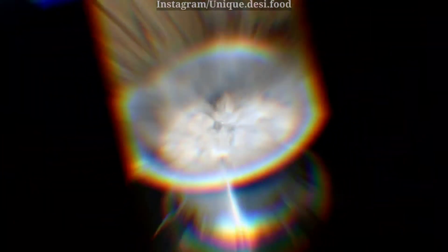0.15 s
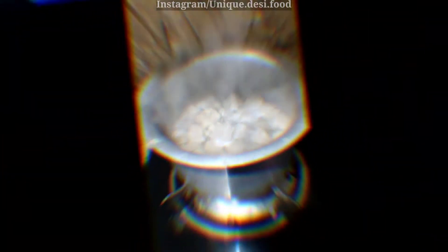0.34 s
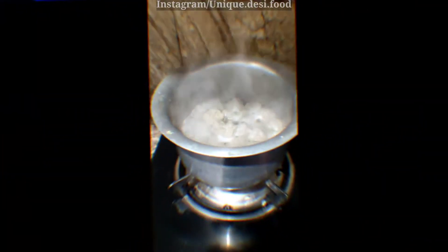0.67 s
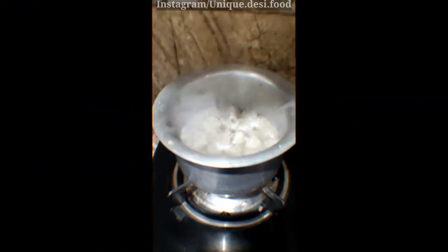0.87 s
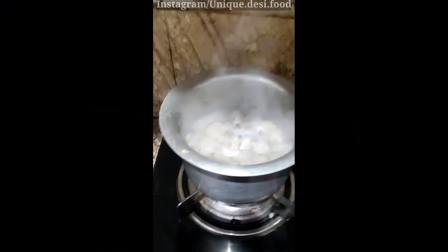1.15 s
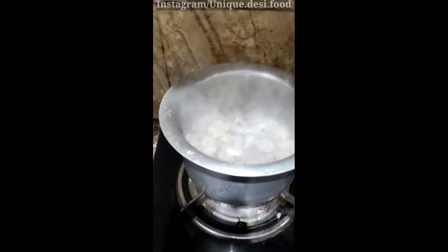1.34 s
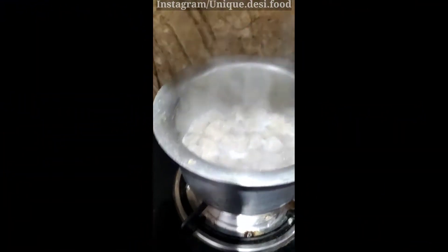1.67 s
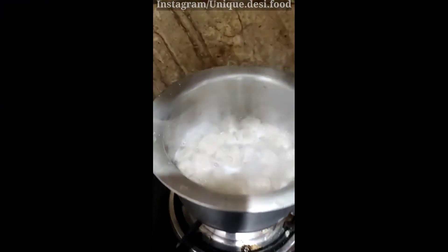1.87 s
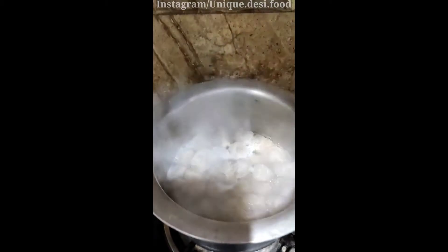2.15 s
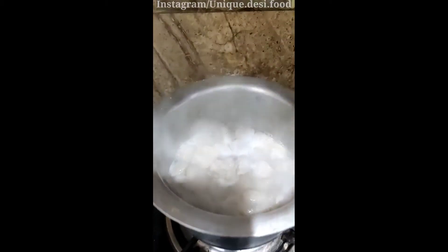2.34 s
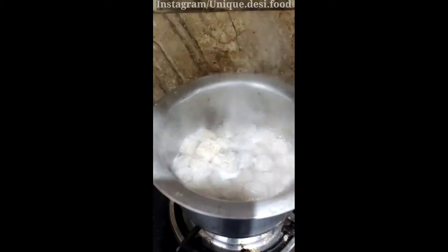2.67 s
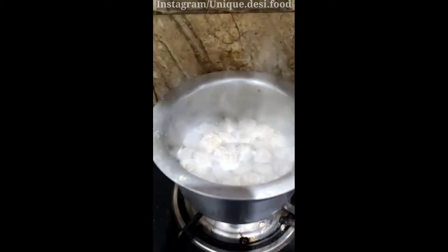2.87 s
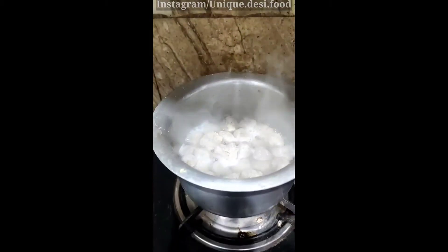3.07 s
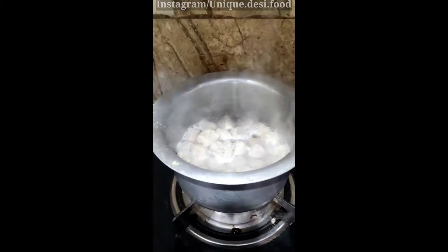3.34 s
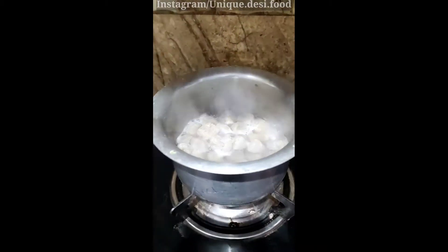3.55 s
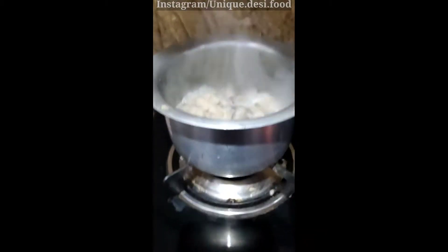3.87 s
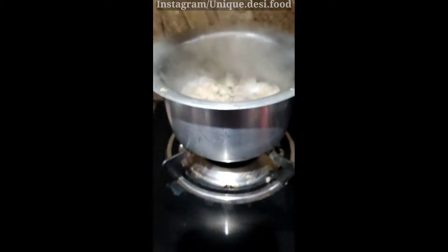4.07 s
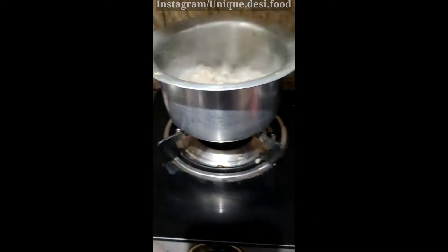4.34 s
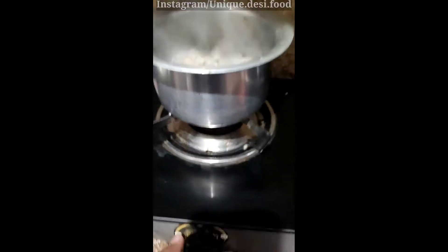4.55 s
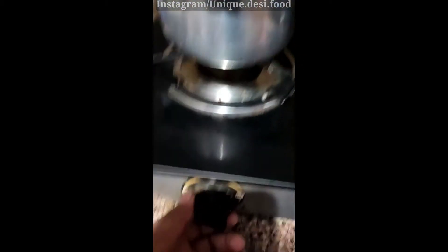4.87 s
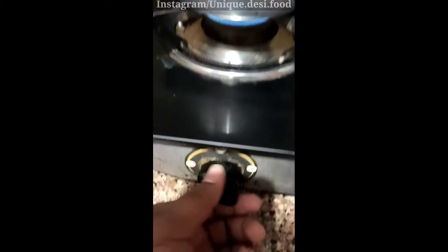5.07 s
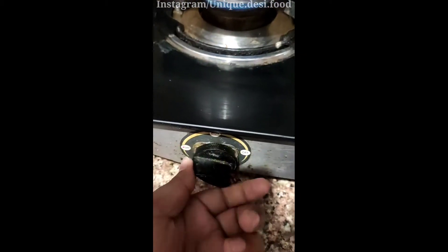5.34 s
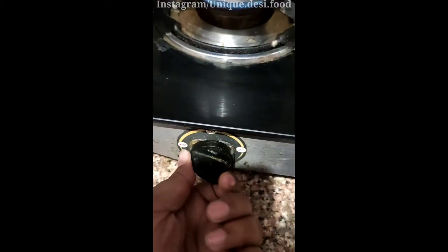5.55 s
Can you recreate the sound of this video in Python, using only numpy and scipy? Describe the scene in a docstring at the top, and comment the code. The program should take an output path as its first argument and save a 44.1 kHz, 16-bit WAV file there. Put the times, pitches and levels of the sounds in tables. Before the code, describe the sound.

In a hard-walled kitchen, water swishes and splashes over steel dishes. Thin metal jingles and dull knocks come between bursts, strongest around the middle. Then vessels clatter, one briefly sings as it is rubbed, and a pot lands hard at the very end. Low rumble wavers underneath; the stereo microphone is close, with a short room echo.

```python
"""Washing up in a hard-walled kitchen

Water swishes and splashes over steel dishes: bands of noise with ringing droplets, plus fading bursts.
A thin metal ring jingles, vessels are knocked and one is dropped hard at the end: volleys of clicks ring
their modes, and a rubbed vessel sings in rising sines. Low outdoor rumble, noise and a wavering tone,
swells in the room's standing waves; a finger taps once near the left microphone, a short filtered push."""
import sys
import numpy as np
from scipy import signal
from scipy.fft import rfft, irfft, next_fast_len
from scipy.io import wavfile
from scipy.ndimage import uniform_filter1d

SR = 44100
rng = np.random.default_rng(int(sys.argv[2]) if len(sys.argv) > 2 else 0)


def bounce(signal):
    """Save signal as a 16-bit WAV file at the path given by the first command-line argument."""
    frames = np.transpose(np.atleast_2d(signal))
    limited = np.clip(frames, -1, 1)
    pcm = np.round(limited * 32767).astype(np.int16)
    wavfile.write(sys.argv[1], SR, pcm)


def field_ratio(decibels):
    """Amplitude ratio for a level in dB (20 dB per decade); scalars and array-likes work."""
    return 10 ** (np.asarray(decibels, dtype=float) / 20)


N = 251807
HOP = 32   # samples between envelope values
LEFT_LAG = 12   # samples by which the left port hears later

# running swish before its trim: t/s, treble level/dB, middle level/dB, low middle level/dB
SWISH_CURVE = [(0.0, -46, -52.5, -56), (0.41, -44, -53.5, -52.5), (0.81, -43, -48, -52.5),
               (1.14, -39, -49, -48), (1.37, -60, -66, -53), (1.72, -49.5, -59.5, -59),
               (2.0, -45, -51.5, -52), (2.24, -41.5, -58.5, -55.5), (2.42, -66, -57.5, -57.5),
               (2.67, -49.5, -68, -54.5), (2.8, -48, -54, -54.5), (2.96, -44, -50, -57),
               (3.15, -49, -55, -55.5), (3.37, -50.5, -62, -57), (3.59, -53.5, -68, -53.5),
               (3.74, -49, -53.5, -50), (4.12, -48.5, -58.5, -54), (4.53, -44, -59, -56.5),
               (4.74, -62.5, -77, -55), (5.04, -42, -54, -56.5), (5.18, -48.5, -43.5, -46.5),
               (5.37, -45.5, -52, -52.5), (5.57, -40, -49, -55), (5.68, -38, -32.5, -37),
               (5.71, -40, -36, -52)]


def rms_one(x):
    """Scale to rms 1."""
    return x / np.sqrt(np.mean(x ** 2) + 1e-20)


def in_time(rows, hop=1):
    """Columns of a curve at every hop-th sample."""
    s, *columns = np.transpose(rows)
    t = np.arange(0, N, hop) / SR
    return [np.interp(t, s, column) for column in columns]


def at_hz(points, hz):
    """Value of a spectrum table at hz, interpolated over log frequency."""
    points = np.array(points, float)
    return np.interp(np.log(hz), np.log(np.maximum(points[:, 0], 1)), points[:, 1])


def drift(rate, count):
    """Slow chance of rms 1 at the envelope rate: noise through a low-pass with its corner near rate Hz."""
    r = np.exp(-2 * np.pi * HOP * rate / SR)
    settle = 2000
    noise = rng.standard_normal(count + settle)
    return rms_one(signal.lfilter([1], [1, -2 * r, r * r], noise)[settle:])


def above(x, hz):
    """Steep high-pass."""
    return signal.sosfilt(signal.butter(6, hz, "high", fs=SR, output="sos"), x)


def ring(clicks, hz, t60):
    """A resonator: a unit click sets a decaying sine of starting height 1 ringing."""
    r, w = field_ratio(-60 / (t60 * SR)), 2 * np.pi * hz / SR
    return signal.lfilter([0, np.sin(w)], [1, -2 * r * np.cos(w), r * r], clicks + 1e-18)


def rattle(s, decay_s):
    """A blow far off arrives as a short uneven volley of clicks, of energy 1."""
    out, at = np.zeros(N), round(s * SR)
    age = np.arange(SR // 2) / SR
    volley = rng.standard_normal(len(age)) * np.exp(-age / decay_s)
    out[at:at + len(age)] = (volley / np.sqrt(np.sum(volley ** 2)))[:N - at]
    return out


def struck_mode(s, decay_s, hz, t60):
    """One mode of a body rung by a blow, scaled to peak 1."""
    rung = ring(rattle(s, decay_s), hz, t60)
    return rung / np.abs(rung).max()


def struck_body(blow, modes):
    """One blow rings all the modes of a body."""
    s, blow_db, decay_s = blow
    return sum(field_ratio(blow_db + mode_db) * struck_mode(s, decay_s, hz, t60) for hz, mode_db, t60 in modes)


def two_ports(shared, own, hz):
    """The shared part reaches the left port later; the rest differs between the ports."""
    # how alike the ports sound: f/Hz, share of power in common [0..1]
    likeness = [(60, 0.65), (250, 1), (600, 0.78), (1500, 0.14), (5000, 0.13), (14000, 0.05)]
    # tilt of the stereo image: f/Hz, left minus right level/dB
    balance = [(60, 2.0), (150, 1), (380, 3.5), (950, 2.5), (2380, 0), (5980, 3), (15000, 2)]
    alike = np.clip(at_hz(likeness, hz), 0, 1)
    common = np.array([np.roll(shared, LEFT_LAG), shared])
    pair = np.sqrt(alike) * common + np.sqrt(1 - alike) * own
    return pair * field_ratio(at_hz(balance, hz) / 2 * np.array([[1], [-1]]))


def share(spectrum, edges):
    """Share of a spectrum's power that falls in each band."""
    power = field_ratio(2 * at_hz(spectrum, np.sqrt(edges[1:] * edges[:-1]))) * np.diff(edges)
    return power / power.sum()


def small_splashes():
    """Small splashes come by chance, louder where the swish is louder; rows as in splashes()."""
    count, over_swish_db, spread_db = 40, 5.5, 10
    treble_db = in_time(SWISH_CURVE)[0]
    rows = []
    for when, size, body, pitch in rng.random((count, 4)):
        level_db = treble_db[int(when * N)] + over_swish_db + spread_db * (2 * size - 1)
        middle_db = -21 + 20 * (body - 0.5)
        rows.append((when * N / SR, level_db, middle_db, -28, 3000 * 3 ** pitch, 0.22))
    return rows


def water_power(edges, swish_db, burst_db, colour_db, bump_db, rise_s):
    """Power per band: the running swish plus bursts that start sharply and die away."""
    # spectra of the three parts of the water: f/Hz, power density/dB per Hz
    treble = [(1470, -30), (2500, -6.5), (3660, -5), (6150, -5.5), (7510, -3.5), (8740, -10.5), (9370, -2),
              (10300, -10), (15500, -9.5)]
    middle = [(560, -63), (950, -18), (1100, 8.5), (1330, -14.5), (1620, 6.5), (2600, -2.5), (3380, -20),
              (5720, -120)]
    low_middle = [(120, -55), (200, -21), (264, 2.5), (350, -1.5), (403, -0.5), (510, -5), (620, 1),
                  (1000, -3.5), (1300, -7.5), (2200, -120)]
    centres = np.sqrt(edges[1:] * edges[:-1])
    shares = np.array([share(spectrum, edges) for spectrum in (treble, middle, low_middle)])
    power = shares.T @ field_ratio(2 * (swish_db + np.array(in_time(SWISH_CURVE, HOP))))
    t = np.arange(0, N, HOP) / SR
    for s, level_db, middle_db, low_db, bright_hz, t60 in splashes() + clatter() + small_splashes():
        age = np.maximum(t - s, 0)
        shape = (1 - np.exp(-age / rise_s)) * field_ratio(-120 * age / max(t60, 0.03))
        # each burst has a favourite pitch in its treble
        bump = field_ratio(2 * bump_db * np.exp(-np.log2(centres / bright_hz) ** 2 / 0.31))
        # noise carries its power well below its peaks
        trims_db = np.array([burst_db, middle_db + colour_db, low_db + colour_db])
        levels = field_ratio(2 * (level_db + trims_db))
        flat = np.ones_like(bump)
        power = power + np.outer(levels @ (shares * [bump, flat, flat]), shape)
    return power


def washing(flicker_db, together_db, drop_db, drops_per_s, cycles_at_1khz):
    """Third-octave bands of smooth spray, each with ringing droplets in it, shaped by the water's power."""
    # large droplets are fainter in the spray: f/Hz, level/dB
    low_drops = [(300, -3.5), (1200, 0)]
    edges = 170 * 2 ** np.arange(0, 6.7, 1 / 3)
    power = water_power(edges, swish_db=2.0, burst_db=-13, colour_db=-9.0, bump_db=6, rise_s=0.00046)
    white = rng.standard_normal((2, 3, N))   # neighbouring bands use different noise
    sizes = field_ratio(5.96 * np.minimum(rng.exponential(1, N), 4)) * (rng.random(N) < drops_per_s / SR)
    dealt = rng.integers(0, 2 * len(power), N)   # two droplet pitches a band
    out, together = 0, drift(11.8, count=power.shape[1])
    for k, (low, high) in enumerate(zip(edges, edges[1:])):
        hz = np.sqrt(low * high)
        band_pass = signal.butter(2, [low, high], "band", fs=SR, output="sos")
        band = signal.sosfilt(band_pass, white[k % 2]) * np.sqrt(SR / 2 / (high - low))
        drops = 0
        for j, pitch in enumerate(rng.uniform(low, high, size=2)):
            drops = drops + ring(sizes * (dealt == 2 * k + j), pitch, cycles_at_1khz / np.sqrt(pitch * 1000))
        spray = band[0] + field_ratio(drop_db + at_hz(low_drops, hz)) * rms_one(drops)
        flicker = field_ratio(together_db * together + flicker_db * drift(11.7, count=len(together)))
        gain = np.sqrt(power[k]) * flicker
        gain = np.interp(np.arange(N) / HOP, np.arange(len(gain)), gain)
        out = out + gain * two_ports(spray, band[1:], hz)
    return out


def basin(x, echo_db, t60):
    """Close reflections around the sink comb the spectrum finely and leave its broad shape alone."""
    size = next_fast_len(N + SR)
    age = np.arange(SR // 2) / SR
    echoes = rms_one(rng.standard_normal(len(age)) * field_ratio(-60 * age / t60))
    echoes *= field_ratio(echo_db) / np.sqrt(len(age))
    echoes[0] = 1   # the direct sound
    comb = rfft(echoes, size)
    comb /= np.sqrt(uniform_filter1d(np.abs(comb) ** 2, size=2000))
    return irfft(rfft(x, size) * comb, size)[:, :N]


def rumble():
    """Broad low noise, a wavering tone on the lowest standing wave, noise ringing in the upper ones."""
    # swells: t/s, broad noise level/dB, lowest standing wave level/dB, upper standing waves level/dB
    swells = [(0.0, -52.5, -59, -55.5), (0.71, -50, -50, -51), (0.92, -47.5, -53.5, -50.5),
              (1.0, -44.5, -43, -50.5), (1.64, -46, -34, -46.5), (1.76, -46, -44.5, -67),
              (1.89, -49, -43, -52.5), (2.04, -48.5, -57, -51.5), (2.3, -46.5, -46, -54.5),
              (2.5, -48, -53, -41), (2.62, -43.5, -45, -51), (2.99, -42.5, -53, -44),
              (3.12, -47.5, -49, -60), (3.26, -46, -46.5, -43.5), (3.54, -47.5, -53.5, -62),
              (3.75, -48.5, -47, -45.5), (4.15, -48.5, -56, -64.5), (4.5, -43.5, -50.5, -46),
              (4.71, -41, -49, -40), (4.82, -49, -42.5, -48), (5.33, -47, -34.5, -50.5),
              (5.45, -46, -44, -44.5), (5.71, -53, -50, -34.5)]
    # spectrum of the broad noise: f/Hz, power density/dB per Hz
    colour = [(12, -33), (20, 2.5), (43, 3), (97, -3), (131, -7.5), (210, -34.5), (270, -39), (460, -120)]
    # upper standing waves: f/Hz, nominal width/Hz, level/dB
    upper_waves = [(105.5, 1.93, -1), (123.8, 6.2, -7.5), (86.7, 6.1, -11)]
    # the low hum sits higher when strong: level/dB, f/Hz
    hum_pitch = [(-50, 55.5), (-43, 59.8)]
    broad_db, lowest_db, upper_db = in_time(swells)
    hz = np.maximum(np.arange(N // 2 + 1) * SR / N, 1)
    noise = irfft(rfft(rng.standard_normal((2, N))) * field_ratio(at_hz(colour, hz)), N)
    broad = field_ratio(broad_db) * rms_one(noise[0] + 0.21 * noise * [[1], [-1]])
    lowest_hz = np.interp(lowest_db, *np.transpose(hum_pitch))
    lowest = np.sqrt(2) * field_ratio(lowest_db) * np.sin(2 * np.pi * np.cumsum(lowest_hz) / SR)
    upper = sum(field_ratio(db) * rms_one(ring(rng.standard_normal(N), f, 2.54 / width))
                for f, width, db in upper_waves)
    return (broad + lowest + field_ratio(upper_db) * upper) * field_ratio([[0.8], [-0.8]])


def jingles():
    """Each touch rings the three high modes of a thin metal ring."""
    # touches: t/s, peak level of the first mode/dB, top mode re first/dB
    touches = [(0.0297, -34, -12), (0.4, -25, 2), (0.886, -23, -1), (0.98, -20.5, -19), (1.7904, -28, 8),
               (1.9346, -31, 14), (2.6335, -12, 3), (2.7417, -24, 9), (2.836, -32, -12), (3.4335, -31, -2),
               (4.726, -30, -15), (5.085, -29, -12)]
    # modes of the ring: f/Hz, t60/s
    ring_modes = [(9685, 0.07), (10810, 0.07), (15500, 0.1)]
    out = np.zeros(N)
    for s, peak_db, top_db in touches:
        for (hz, t60), mode_db in zip(ring_modes, (0, -16, top_db)):
            out += field_ratio(peak_db + mode_db) * struck_mode(s, 0.012, hz, t60)
    return out


def splashes():
    """Loud splashes of water: noisy bursts, each as bright as its favoured pitch and with its own decay."""
    # bursts before the trims of water_power: t/s, level/dB, middle re level/dB, favoured f/Hz, t60/s
    loud_splashes = [(0.262, -28.5, -28, 8590, 0.66), (0.5826, -31.5, -2, 3880, 0.36),
                     (0.6494, -35, 1, 8450, 0.51), (0.7506, -27.5, -8, 8330, 0.48),
                     (0.808, -23, -20, 4130, 0.22), (0.887, -27.5, -8.5, 5450, 0.95),
                     (0.941, -31.5, 2, 8110, 0.31), (1.0332, -21.5, -11.5, 3870, 0.22),
                     (1.148, -18.5, -21, 7300, 0.16), (1.207, -21, -10, 5040, 0.73),
                     (1.279, -17.5, -33, 6960, 0.15), (1.79, -28.5, -12, 8000, 0.32),
                     (2.0089, -32.5, -34, 8200, 0.35), (2.1594, -25.5, -9, 2800, 0.16),
                     (2.317, -29.5, -24, 9300, 0.66), (2.372, -28, -26, 8350, 0.21),
                     (2.62, -10.5, -16, 8060, 0.31), (2.71, -20.5, -6.5, 4080, 0.54),
                     (2.7494, -28, -2, 4030, 0.15), (2.8663, -24, -27, 9070, 0.16),
                     (2.8994, -30, -5, 7940, 0.54), (3.009, -12, -10, 7070, 0.2),
                     (3.0264, -10.5, -11, 4330, 0.17), (3.054, -15, -9, 3440, 0.31),
                     (3.3, -32, -9.5, 7600, 0.43), (3.3456, -28.5, -20, 9600, 0.25),
                     (3.5394, -32.5, -14, 7560, 1), (3.6017, -27, -12, 2720, 0.55),
                     (3.635, -23, -16.5, 8400, 0.8), (3.6999, -27, -6, 6660, 0.67),
                     (3.9734, -32.5, -9, 8000, 0.22), (3.999, -25, -14, 4360, 0.25),
                     (4.265, -29.5, -10.5, 5900, 0.85), (4.37, -27.5, -32, 8600, 0.25),
                     (4.419, -24, -35, 7100, 0.52), (5.164, -24, -24, 4420, 0.48),
                     (5.419, -22.5, -18, 7880, 0.26)]
    low_db = -26   # low middle re level, before the trims
    return [(s, db, middle_db, low_db, hz, t60) for s, db, middle_db, hz, t60 in loud_splashes]


def dull_knocks():
    """A dull knock rings a heavily damped pair of pitches, above and below its own."""
    # knocks: t/s, peak level of each pitch/dB, middle f/Hz
    knocks = [(0.499, -40.5, 670), (0.659, -37.5, 800), (0.844, -40, 805), (1.069, -46, 1040),
              (1.964, -40.5, 1490), (2.184, -43, 877), (2.329, -31, 1826), (2.74, -40, 560),
              (3.05, -29, 1184), (3.968, -40, 1110), (4.01, -40.5, 407), (4.163, -42, 1102),
              (4.484, -33.5, 556), (5.367, -40, 1404)]
    pair_ratio, volley_cycles, t60 = 1.109, 13.6, 0.022
    out = np.zeros(N)
    for s, peak_db, hz in knocks:
        for pitch in (hz / pair_ratio, hz * pair_ratio):
            out += field_ratio(peak_db) * struck_mode(s, volley_cycles / hz, pitch, t60)
    return out


def tap():
    """A steep push that relaxes; the housing passes no deep bass."""
    tap_s, push_db, decay_s = 2.0722, -12.5, 0.00029
    age = np.maximum(np.arange(N) / SR - tap_s, 0)
    push = (age > 0) * np.exp(-age / decay_s)
    push = signal.lfilter(*signal.butter(1, [220, 5000], "band", fs=SR), push)
    return field_ratio(push_db) * push * field_ratio([[0], [-20.0]])


def cutlery():
    """A small piece of cutlery is struck once and rings its high modes briefly."""
    # modes: f/Hz, level/dB, t60/s
    spoon_modes = [(7570, -4, 0.026), (8210, 3.5, 0.038), (8900, 2, .03)]
    # the blow: t/s, level/dB, volley decay/s
    spoon_blow = (2.621, -18.5, 0.0036)
    return struck_body(spoon_blow, spoon_modes)


def clatter():
    """Noisy clatter of vessels set down or dropped; rows as in splashes()."""
    # bursts before the trims of water_power: t/s, level/dB, low middle re level/dB, favoured f/Hz, t60/s
    clatter_bursts = [(4.4602, -24, -9, 8200, 0.28), (4.484, -33, 0, 3160, 0.21),
                      (4.66, -25.5, -2, 4340, 0.38), (5.012, -15, -10.5, 7500, 0.24),
                      (5.098, -22.5, -7, 2500, 0.14), (5.199, -19.5, -9, 8500, 0.36),
                      (5.5189, -3.5, -12.5, 10000, 0.34), (5.5594, -7.5, -12.5, 2470, 0.57),
                      (5.597, -15.5, -2, 2780, 0.38)]
    middle_db = -5.5   # re level, before the trims
    return [(s, db, middle_db, low_db, hz, t60) for s, db, low_db, hz, t60 in clatter_bursts]


def steel_pan():
    """Each blow on the pan favours the modes near one pitch, with some chance per mode."""
    # modes of a steel pan: f/Hz, level/dB, t60/s
    pan_modes = [(312, 6, 0.1), (439.6, -2, 0.3), (773, -2, 0.16), (1003, 2, 0.33), (1626, 5, 0.33),
                 (1823, 0, 0.12), (2449, 3, 0.17), (3100, -14, .1), (3763, -12, 0.15), (4170, -7, 0.18),
                 (4400, -8, 0.12), (4970, -6, 0.07)]
    # blows: t/s, level/dB, favoured f/Hz, volley decay/s
    pan_blows = [(4.657, -49.5, 1480, 0.011), (5.017, -38, 2410, 0.018), (5.192, -38.5, 310, 0.019)]
    loss_db_per_octave, spread_db = 3.0, 1.5
    out = np.zeros(N)
    for s, blow_db, favoured_hz, decay_s in pan_blows:
        for hz, mode_db, t60 in pan_modes:
            octaves_off = abs(np.log2(hz / favoured_hz))
            place_db = spread_db * rng.standard_normal() - loss_db_per_octave * octaves_off
            out += field_ratio(blow_db + mode_db + place_db) * struck_mode(s, decay_s, hz, t60)
    return out


def singing():
    """A rubbed vessel sings: each mode swells quickly, rises a little in pitch and fades."""
    # modes: start t/s, end t/s, start f/Hz, end f/Hz, level before the swell/dB
    sung_modes = [(5.209, 5.297, 790, 792, -34.5), (5.215, 5.32, 1390, 1400, -37),
                  (5.216, 5.415, 1730, 1790, -35), (5.25, 5.36, 2080, 2150, -38.5)]
    t, out = np.arange(N) / SR, 0
    for start, end, start_hz, end_hz, level_db in sung_modes:
        swell = np.interp(t, [start, start + 0.019, end - 0.03, end + 0.032], [0, 0.9, 0.3, 0])
        hz = np.interp(t, [start, end], [start_hz, end_hz])
        out = out + field_ratio(level_db) * swell * np.sin(2 * np.pi * np.cumsum(hz) / SR)
    return out


def dropped_pot():
    """The big pot is dropped hard and rings all its modes."""
    # modes: f/Hz, level/dB, t60/s
    pot_modes = [(271.3, 2.5, 0.45), (405, -4, 0.57), (760, 6.5, 0.15), (859, 6, 0.073), (914, 10.5, 0.072),
                 (1030, 14.5, 0.02), (1249, 5, 0.3), (1580, 13, 0.047), (1840, 7.5, 0.31), (2150, -4, 0.61),
                 (2562, 6, 0.05), (3190, -18, 0.17), (3860, -14, 0.23), (4810, -2, 0.14)]
    # the drop: t/s, level/dB, volley decay/s
    pot_drop = (5.52, -26, 0.049)
    return struck_body(pot_drop, pot_modes)


def kitchen(x):
    """Diffuse echoes: decaying noise, another on each side; long waves reach both ports alike."""
    t60 = 0.25
    age = np.arange(SR) / SR
    tail = rng.standard_normal((2, SR)) * field_ratio(-60 * age / t60) * (age > 0.004)
    tail /= np.sqrt(np.sum(tail ** 2, axis=1, keepdims=True))
    mid, side = signal.fftconvolve(x[None], tail, axes=1)[:, :N]
    return (mid + above(side, hz=406) * [[1], [-1]]) / np.sqrt(2)


def scene():
    """All sources at the two microphone ports."""
    ring_side = jingles()
    vessels = above(dull_knocks() + cutlery() + steel_pan() + singing() + dropped_pot(), hz=214)
    # the ring sounds from the washing side; the vessels stand equally far from both ports
    near = np.array([np.roll(ring_side, LEFT_LAG), ring_side]) + vessels
    near = near * field_ratio([[1.5], [-1.5]])
    water = washing(flicker_db=1.5, together_db=1.0, drop_db=-2.0, drops_per_s=1200, cycles_at_1khz=52)
    water = above(water, hz=231)   # the dishes radiate little deep sound
    water = basin(water, echo_db=-5.0, t60=0.025)
    echoes = field_ratio(-1.5) * kitchen(field_ratio(-5.5) * ring_side + vessels)
    return water + near + echoes + rumble() + tap()


def top_cut(x):
    """Nothing passes above the cut-off."""
    return signal.sosfilt(signal.butter(12, 16540, fs=SR, output="sos"), x)


def record(dry):
    """Peaks beyond full scale are clipped, then the top is cut steeply."""
    cut = signal.cheby2(16, 70, 15850, fs=SR, output="sos")
    mix = signal.sosfilt(cut, np.clip(dry, -1, 1))
    return top_cut(mix)


dry = scene()
out = record(dry)
bounce(out)
```